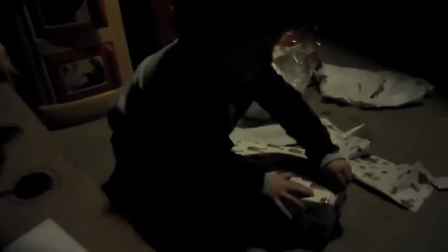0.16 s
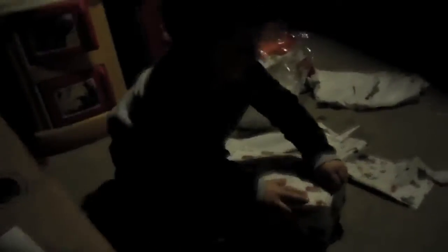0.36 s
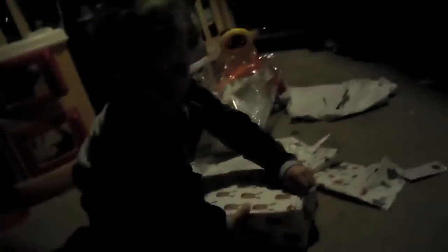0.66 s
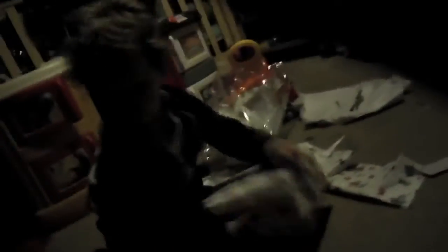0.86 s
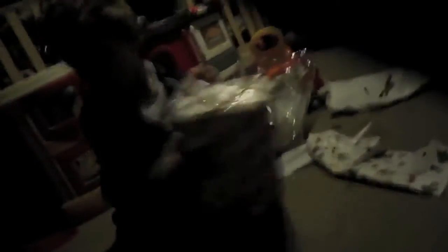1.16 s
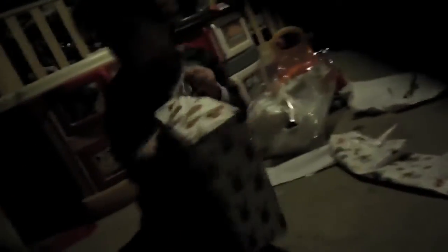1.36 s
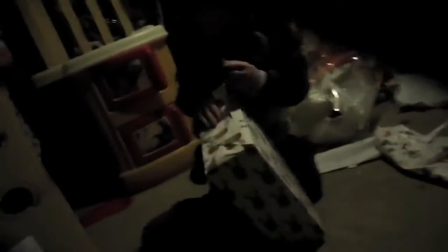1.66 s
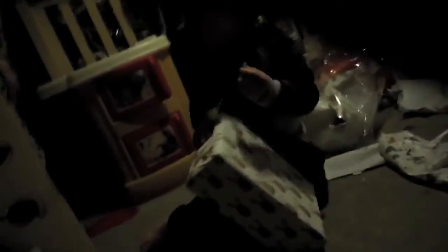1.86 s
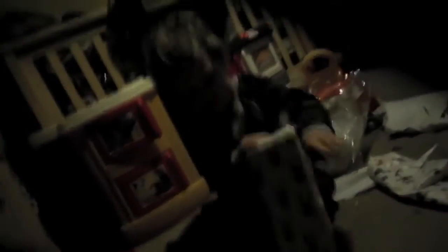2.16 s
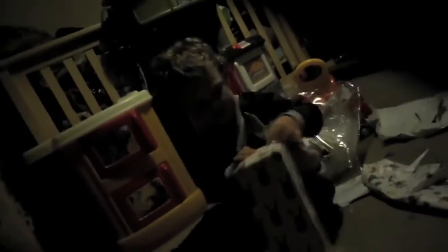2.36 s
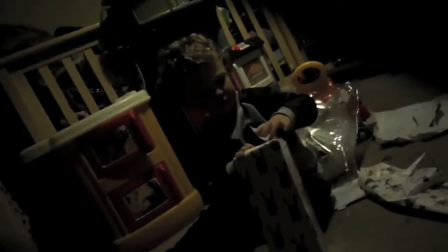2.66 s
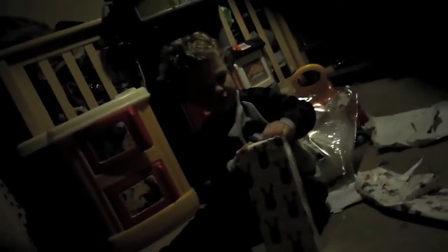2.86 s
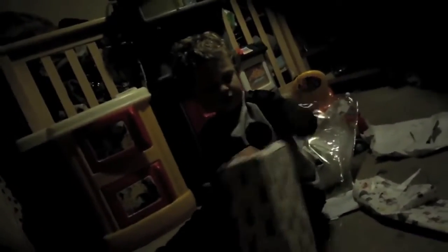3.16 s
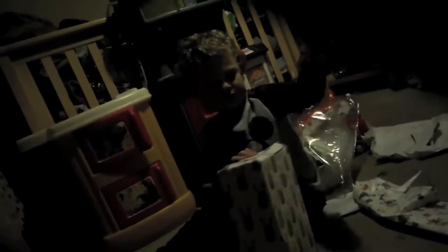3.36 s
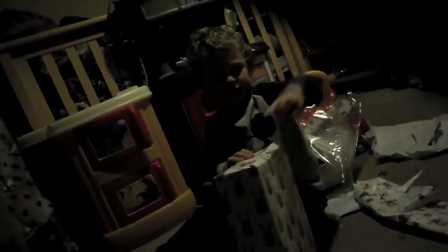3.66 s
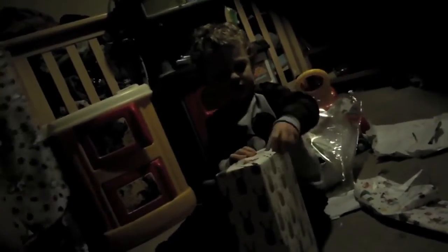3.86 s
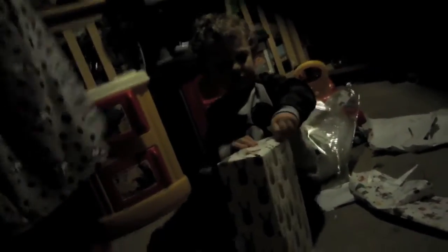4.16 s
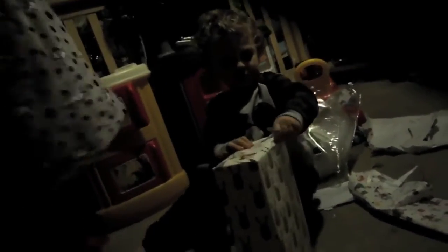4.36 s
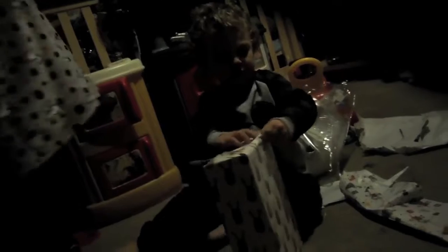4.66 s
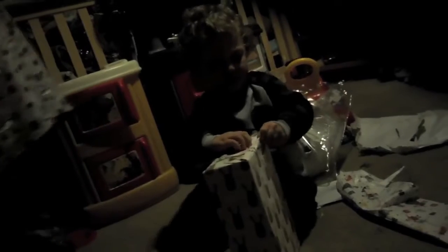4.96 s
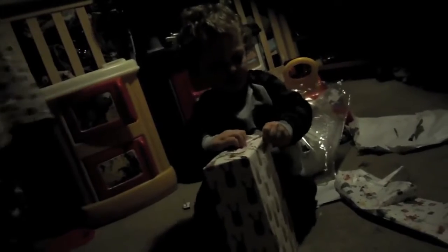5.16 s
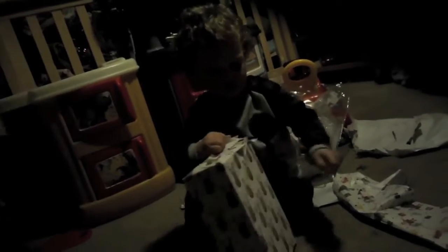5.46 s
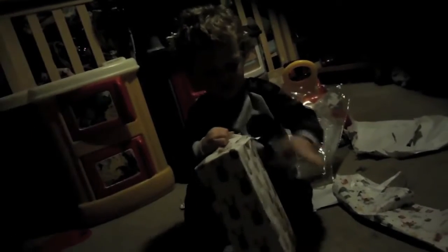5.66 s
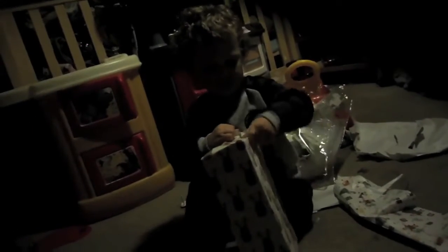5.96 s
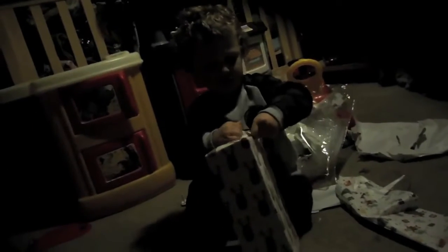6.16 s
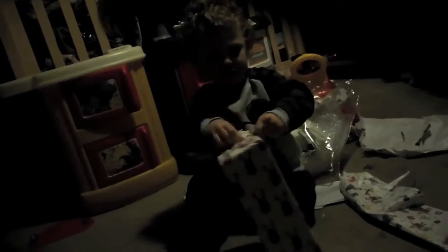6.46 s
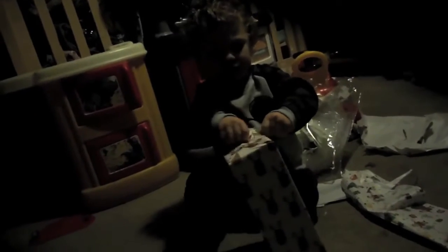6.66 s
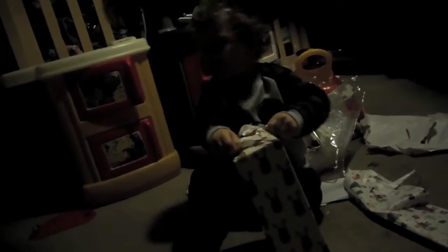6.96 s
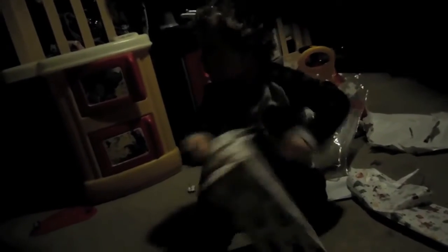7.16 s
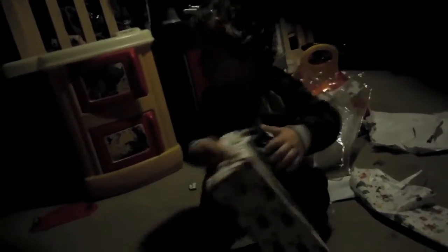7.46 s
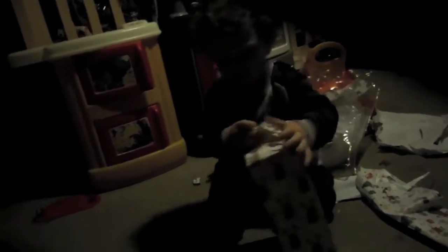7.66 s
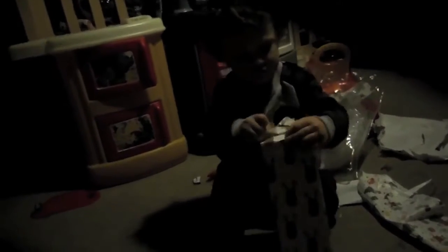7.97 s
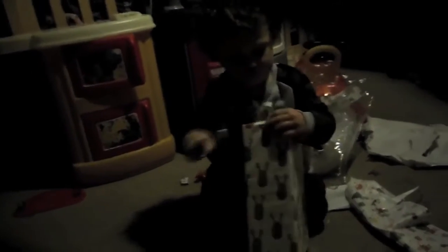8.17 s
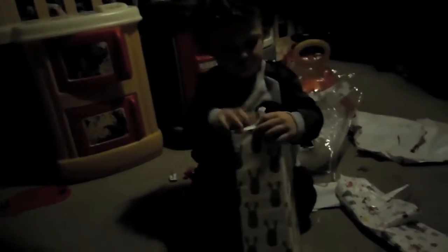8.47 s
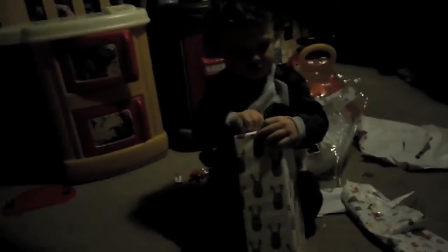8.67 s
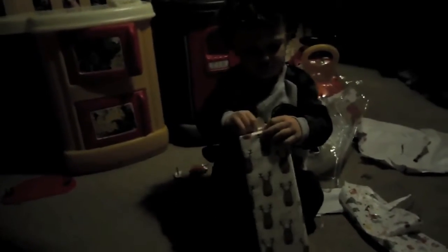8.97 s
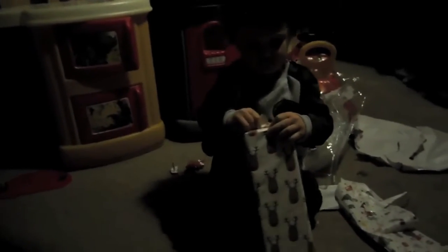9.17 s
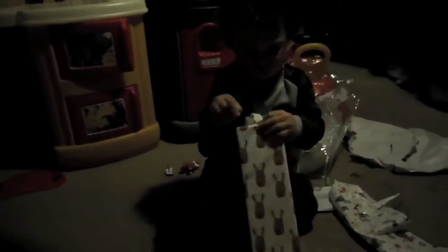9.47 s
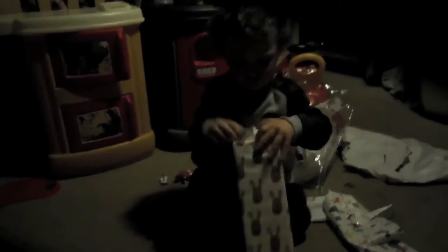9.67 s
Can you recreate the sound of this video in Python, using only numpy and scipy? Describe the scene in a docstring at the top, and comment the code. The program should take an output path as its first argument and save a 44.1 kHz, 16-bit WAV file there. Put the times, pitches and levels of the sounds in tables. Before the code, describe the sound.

Steady hiss covers the first second with a few paper ticks and a tiny box squeak, then falls away. A child tears wrapping paper from a cardboard box: a loud cluster of rips and hollow bumps at one second, then irregular snaps, short tears and finger rustling with pauses. Small carpeted room, microphone about a metre away, faint low room noise and a thin high whine.

```python
"""A steady hiss comes first and falls away around one second, leaving faint room noise and a thin whine.
On a carpeted floor, about a metre from a pair of microphones, a child tears wrapping paper off a gift box.
Short rips (bursts of jerking fibre clicks) and sharp snaps (a click and a flutter) stand over finger rustle;
the cardboard box is bumped through its wall resonances, rubbed with friction noise and squeaks as gliding tones.
The small room answers with a few echoes and a short tail."""
import sys
import numpy as np
from scipy import signal
from scipy.fft import rfft, irfft
from scipy.io import wavfile
from scipy.ndimage import uniform_filter1d

SR = 44100
rng = np.random.default_rng(int(sys.argv[2]) if len(sys.argv) > 2 else 0)


def dump(signal):
    """Clip the signal to [-1, 1] and save it as 16-bit WAV at the path in sys.argv[1]."""
    limited = np.clip(np.atleast_2d(signal).T, -1, 1)
    pcm = np.round(limited * 32767).astype(np.int16)
    wavfile.write(sys.argv[1], SR, pcm)


N = 433062
TIME = np.arange(N) / SR


def gain_of(db):
    """Decibels to amplitude."""
    return 10 ** (np.asarray(db) / 20)


def evened(x):
    """Scales to rms 1."""
    return x / np.sqrt(np.mean(x ** 2) + 1e-20)


def drift(count, smooth_s):
    """Slow random wandering of rms 1: white noise averaged over smooth_s seconds."""
    return evened(uniform_filter1d(rng.standard_normal(count), max(int(smooth_s * SR), 1)))


def read(points, hz):
    """Reads a table of (Hz, value) on a log-frequency axis."""
    f, value = np.transpose(points)
    return np.interp(np.log(hz + 1), np.log(f + 1), value)


def add(mix, s, sound):
    """Mixes a sound in at s seconds."""
    part = mix[..., max(round(s * SR), 0):][..., :sound.shape[-1]]
    part += sound[..., :part.shape[-1]]


def colour(x, shape_db, size=2048):
    """Causal minimum-phase filter of unit energy; shape_db gives dB for each frequency."""
    db = shape_db(abs(np.fft.fftfreq(size, 1 / SR)))
    log_spectrum = np.conj(signal.hilbert(np.log(gain_of(db))))
    taps = np.fft.ifft(np.exp(log_spectrum)).real
    taps /= np.linalg.norm(taps)
    return signal.oaconvolve(x, taps[None], axes=1)


def noise(count, apart):
    """White noise at two microphones: a common part and a smaller part of opposite sign."""
    common = rng.standard_normal(count)
    opposed = rng.standard_normal(count) * np.array([[1], [-1]])
    return (common + apart * opposed) / np.sqrt(1 + apart ** 2)


# Spectrum of the low noise of the room. Each row: frequency in Hz, density in relative dB per Hz.
ROOM_NOISE_SPECTRUM = [(20, -5), (30, -4), (39, 3.5), (52, -4.5), (90, -2), (180, -7), (320, -9.5),
                       (600, -16.5), (1200, -21.5), (2200, -27), (4000, -29), (7000, -31.5), (9500, -29.5),
                       (12000, -27.5), (16000, -35.5)]


def room_noise(level_db=-48.5):
    """Steady noise of the room, strongest in the bass."""
    floor = colour(noise(N, apart=.3), lambda hz: read(ROOM_NOISE_SPECTRUM, hz), size=8192)
    return gain_of(level_db) * floor[:, :N]


# Spectrum of the hiss. Each row: frequency in Hz, density in relative dB per Hz.
HISS_SPECTRUM = [(80, -12), (200, -4.5), (400, -2), (600, -7.5), (850, -4), (1150, -4), (1900, -9.5),
                 (3400, -7.5), (5400, -1), (6800, -5), (8400, -6), (10000, -5), (11800, -.5), (14500, -7),
                 (16000, -14)]
# Course of the hiss. Each row: time in seconds, level in dB.
HISS_COURSE = [(0, -36), (.5, -35.5), (.88, -35.5), (.96, -44), (1.3, -54), (2.5, -70), (3, -90)]


def hiss():
    """Coloured noise, steady at first, dropping just before one second and then dying away."""
    level_db = np.interp(TIME, *np.transpose(HISS_COURSE))
    return gain_of(level_db) * colour(noise(N, apart=.25), lambda hz: read(HISS_SPECTRUM, hz))[:, :N]


def whine(level_db=-62, pitch_hz=10234, wander_hz=70, wander_s=.004):
    """A thin electronic whine: a sine even in level but jittering in pitch."""
    turns = np.cumsum(pitch_hz + wander_hz * drift(N, wander_s)) / SR
    return gain_of(level_db) * evened(np.sin(2 * np.pi * turns))


# Spectrum radiated by the box. Each row: frequency in Hz, density in relative dB per Hz.
CARDBOARD_SPECTRUM = [(60, -18), (170, -2), (300, -1), (450, -3), (750, -6.5), (1200, -4.5), (1800, -8.5),
                      (2500, -7), (5000, -15), (12000, -26)]
# Resonances of the box walls. Each row: frequency in Hz, width in Hz, height in dB above that spectrum.
BOX_RESONANCES = [(302, 55, 4.5), (385, 55, 4), (564, 38, 4), (654, 38, 4), (853, 70, 2.5),
                  (1120, 120, 2.5)]


def cardboard(hz):
    """Response of the box in dB: a broad hump with a few damped wall resonances."""
    walls = sum(db / (1 + (2 * (hz - f) / width) ** 2) for f, width, db in BOX_RESONANCES)
    return read(CARDBOARD_SPECTRUM, hz) + walls


# Hands squeak on the wrapped box. Each row: start in seconds, length in seconds, first pitch in Hz,
# last pitch in Hz, level of the tone in dB, step from one partial to the next in dB.
SQUEAKS = [(0.44, 0.026, 290, 310, -35.5, -10), (0.46, .02, 376, 395, -31, -22),
           (3.82, 0.034, 2520, 2150, -47, -7), (3.822, .016, 3100, 3350, -46.5, -14)]


def squeaks(rough=.6, partials=3):
    """Stick and slip of a hand on the wrapped box: a brief tone of gliding pitch with a rough scrape."""
    out = np.zeros((2, N))
    for s, length, first_hz, last_hz, db, overtone_db in SQUEAKS:
        t = np.arange(0, length, 1 / SR)
        turns = np.cumsum(np.linspace(first_hz, last_hz, len(t))) / SR
        tone = evened(sum(gain_of(overtone_db * k) * np.sin(2 * np.pi * (k + 1) * turns)
                          for k in range(partials)))
        scrape = colour(noise(len(t), apart=.2), cardboard)[:, :len(t)]
        swell = signal.windows.tukey(len(t), .7)
        add(out, s, gain_of(db) * swell * (tone + rough * scrape))
    return out


# Fingers and sheet slide along the box. Each row: start in seconds, end in seconds, level in dB.
RUB_STROKES = [(1.681, 1.824, -47), (2.02, 2.143, -44.5), (2.23, 2.31, -47), (2.56, 2.8, -55.5),
               (2.82, 2.97, -49), (3.779, 3.9, -47.5), (4.11, 4.23, -48), (4.25, 4.46, -48.5),
               (4.59, 4.718, -51), (4.82, 5.147, -47), (5.2, 5.285, -49), (5.879, 5.938, -52),
               (6.189, 6.3, -53), (6.479, 6.58, -51.5), (8.07, 8.18, -46), (8.881, 9.24, -54.5)]
# Spectrum of the sliding. Each row: frequency in Hz, density in relative dB per Hz.
RUB_SPECTRUM = [(100, -11), (300, 5), (700, -0.5), (1600, -4), (2400, -3), (3400, -1.5), (5000, -3),
                (7500, -5.5), (11000, -7), (16000, -13)]


def rubs(judder_db=3.5, judder_s=.006):
    """Dry sliding friction: each stroke of noise swells and fades, and judders on the way."""
    out = np.zeros((2, N))
    for start, end, db in RUB_STROKES:
        count = int(max(end - start, .02) * SR)
        judder = gain_of(judder_db * drift(count, judder_s))
        friction = evened(judder * noise(count, apart=0.39))
        stroke = signal.windows.tukey(count, .7) * friction
        add(out, start, gain_of(db) * colour(stroke, lambda hz: read(RUB_SPECTRUM, hz)))
    return out


# Hands and floor bump the box. Each row: time in seconds, level in dB before the common trim,
# centre of the sound in Hz.
BOX_KNOCKS = [(.201, -39, 900), (.916, -24.5, 820), (.97, -37.5, 400), (1.032, -23.5, 674),
              (1.07, -37, 650), (1.094, -29.5, 645), (1.122, -33, 900), (1.196, -36, 600),
              (1.314, -31.5, 607), (1.398, -38, 560), (1.609, -36.5, 910), (2.066, -36, 650),
              (2.144, -29.5, 390), (2.161, -30, 480), (2.328, -28, 1400), (2.385, -28.5, 1190),
              (2.414, -31, 1200), (2.461, -38.5, 1200), (3.148, -34.5, 1310), (3.15, -35.5, 220),
              (3.736, -42, 120), (3.788, -43.5, 900), (3.826, -36, 800), (5.145, -29.5, 270),
              (5.316, -37.5, 350), (6.435, -44, 420), (6.595, -35, 380), (6.931, -38, 1620),
              (7.527, -34.5, 380), (7.53, -43, 1300), (7.666, -39, 1800), (7.91, -45, 1100),
              (8.061, -38.5, 350), (9.364, -29.5, 2500), (9.366, -33, 140), (9.368, -33, 750),
              (9.42, -26, 656)]


def knocks(trim_db=.8, focus_db=5, blow=6, depth_db=19, fade_s=.021):
    """A blow and a brief scuff sound the cardboard; place and hardness of the contact set the register."""
    out, t = np.zeros((2, N)), np.arange(0, 3 * fade_s, 1 / SR)
    contact = gain_of(-20 * t / fade_s)  # fades by 20 dB in fade_s
    for s, db, centre_hz in BOX_KNOCKS:
        def register(hz):
            octaves_off = np.log2((hz + 1) / centre_hz)
            return cardboard(hz) - np.minimum(focus_db * octaves_off ** 2, depth_db)

        push = contact * noise(len(t), apart=0.15)
        push[:, 0] += blow
        knock = colour(push, register)
        knock *= np.sqrt(4 * np.sum(contact ** 2) / np.sum(knock ** 2))
        add(out, s, gain_of(db + trim_db) * knock)
    return out


# Spectrum of the sheet. Each row: frequency in Hz, density in relative dB per Hz.
PAPER_SPECTRUM = [(100, -27), (300, -20.5), (650, -27), (1300, -17), (1900, -18.5), (2600, -10),
                  (3300, -8.5), (4200, -9), (5200, -8.5), (7000, -7.5), (9000, -3), (11000, -1),
                  (12100, 1.5), (14000, -4), (16000, -9.5)]


def paper(x, tilt, knee_hz=1800, ripple_db=2.5, count=28):
    """The sheet radiates mostly treble, more so when taut; each patch has its own chance resonances.

    The tilt in dB per octave acts above knee_hz."""
    ripple = ripple_db * rng.standard_normal(count)
    grid = np.linspace(0, SR / 2, count)

    def sheet(hz):
        tautness = tilt * np.log2(np.maximum(hz, knee_hz))
        return read(PAPER_SPECTRUM, hz) + tautness + np.interp(hz, grid, ripple)

    return colour(x, sheet)


def crackle(count, per_s, spread_db, smooth):
    """Fibres giving way: random clicks of very unequal size over a share of smooth friction noise."""
    chance, size, sign, side = rng.random((4, count))
    sizes = gain_of(spread_db * np.minimum(-np.log(1 - size), 3.5))
    clicks = (chance < per_s / SR) * sizes * np.sign(sign - .5)
    clicks = evened(clicks * (1 + (side - .5) * np.array([[.7], [-.7]])))  # each has its own place
    return (clicks + smooth * noise(count, apart=0.55)) / np.sqrt(1 + smooth ** 2)


# The fingers grip and work the sheet. Each row: start in seconds, length in seconds,
# level in dB before the common trim.
FINGER_GRIPS = [(0.87, 0.37, -44.5), (1.263, 0.21, -51), (1.502, 0.31, -43.5), (1.932, 0.25, -44.5),
                (2.19, 0.23, -49), (2.56, .18, -53.5), (2.803, 0.34, -47), (3.393, .07, -56),
                (3.824, .21, -48.5), (4.13, 0.11, -53.5), (4.24, 0.21, -48), (4.47, .13, -52),
                (4.605, 0.19, -45.5), (4.868, 0.61, -44), (5.533, 0.092, -45), (5.877, 0.048, -51.5),
                (6.059, 0.042, -46.5), (6.211, .26, -50), (6.587, 0.36, -45), (7.113, 0.038, -47),
                (7.267, 0.024, -46), (7.376, .13, -52.5), (7.528, 0.19, -46.5), (7.811, .14, -44.5),
                (8.03, 0.094, -45.5), (8.562, .22, -51), (8.9, .32, -47.5), (9.285, .16, -43),
                (9.565, 0.046, -49.5), (9.66, 0.15, -51.5)]


def finger_effort(arch_db=3, trim_db=1, close_s=0.035, release_s=.07, stir_db=-65):
    """Each grip closes quickly, presses hardest midway and lets go more slowly; between, the sheet stirs.

    The closing and release times are for 20 dB."""
    effort = np.full(N, gain_of(stir_db))
    for start, length, db in FINGER_GRIPS:
        away = np.maximum((start - TIME) / close_s, (TIME - start - length) / release_s)
        near = away < 2
        slack = np.minimum((2 * (TIME[near] - start) / length - 1) ** 2, 1)
        grip = gain_of(db + trim_db - arch_db * slack - 20 * np.maximum(away[near], 0))
        effort[near] = np.maximum(effort[near], grip)
    return effort


# Spectrum of the fine crinkles. Each row: frequency in Hz, density in relative dB per Hz.
RUSTLE_SPECTRUM = [(100, -16), (300, -1.5), (800, -4.5), (1700, -6.5), (2700, -3), (5000, -3.5),
                   (7000, -3.5), (9000, -2.5), (12000, 0.5), (14000, -3.5), (16000, -9)]


def rustle(level_db=-0.5, clump_db=2, clump_s=.015, tick_db=-8.5, tick_tilt=-2):
    """Small crinkles come in clumps as the fingers work the sheet; now and then a small crease ticks."""
    effort = finger_effort()
    clumps = gain_of(level_db + clump_db * drift(N, clump_s))
    crinkles = effort * clumps * crackle(N, per_s=900, spread_db=5.5, smooth=.75)
    ticks = effort * gain_of(tick_db) * crackle(N, per_s=35, spread_db=3, smooth=0)
    crinkles = colour(crinkles, lambda hz: read(RUSTLE_SPECTRUM, hz))
    return (crinkles + paper(ticks, tick_tilt))[:, :N]


# Loud snaps of the sheet. Each row: time in seconds, level in dB over 2 ms before the common trim,
# tilt in dB per octave.
SHEET_SNAPS = [(0.0928, -19, -1.5), (.187, -28, -2), (.3082, -28.5, -7), (.4776, -29, 1),
               (0.5075, -21.5, 0.5), (1.0235, -23, -3), (1.0806, -25, 0), (1.1133, -9.5, -1.5),
               (1.1394, -15, -1), (1.148, -14, 0), (1.185, -19.5, 1), (1.2657, -27.5, -1),
               (1.3309, -31, -2), (1.5006, -28.5, -1.5), (1.6564, -22, 7), (1.8633, -26, 2.5),
               (1.9366, -30, -1), (2.0165, -33, -1), (2.3882, -20, -5), (3.0523, -21, 4), (3.1333, -26, -2),
               (3.1431, -18, -2), (3.1497, -9.5, 2), (3.1543, -13, 2), (3.9025, -31, 1.5),
               (4.0197, -31.5, -0.5), (4.2368, -24.5, -1.5), (4.3322, -30, 2), (4.618, -29, 1),
               (4.6714, -29.5, -2), (4.7506, -24.5, -2), (4.795, -30, 9), (5.0247, -27, 3),
               (5.0874, -29, 0), (5.1137, -26, -4), (5.1439, -10, 3), (5.2459, -27, 1), (5.2636, -17, 1),
               (5.2855, -23, -1), (5.3224, -13.5, 2.5), (5.361, -22, 1), (5.444, -30, 1),
               (5.5923, -29.5, 0.5), (6.2194, -26, 5.5), (6.4294, -27.5, -0.5), (6.4984, -37, 4),
               (6.5959, -26, -5), (6.6533, -21.5, 1), (6.734, -24, 5), (6.7622, -13.5, 2),
               (6.7811, -19, -0.5), (6.9326, -26.5, -5.5), (6.9887, -30.5, 2), (7.2387, -33, -8.5),
               (7.482, -33, -1.5), (7.5406, -28, 1.5), (7.6811, -13, 5), (7.801, -32.5, -2.5),
               (7.9317, -31.5, -1), (8.0135, -39, -6), (8.0375, -26.5, -2.5), (8.0451, -20, 5),
               (8.0524, -16.5, 6), (8.0583, -16, 4), (8.5597, -32.5, -3), (8.6125, -28, -1.5),
               (8.6999, -29, 1), (9.195, -31, -3.5), (9.3643, -8.5, -1), (9.6565, -26.5, 1)]


def snaps(trim_db=.5, flutter_s=0.00058, flutter=0.59, tail_s=0.0039, tail=0.075):
    """A crease buckles with one click, and the patch around it flutters for a millisecond or so."""
    out, t = np.zeros((2, N)), np.arange(SR // 80) / SR
    window = SR * .002  # samples over which the level holds
    for s, db, tilt in SHEET_SNAPS:
        fading = flutter * np.exp(-t / flutter_s) + tail * np.exp(-t / tail_s)
        burst = noise(len(t), apart=0.2) * fading
        burst[:, 0] += rng.choice([-1, 1])
        snap = paper(burst, tilt)
        snap = snap * np.sqrt(window / np.sum(snap ** 2, axis=1, keepdims=True))
        add(out, s, gain_of(db + trim_db) * snap)
    return out


# Tears in the sheet. Each row: crest in seconds, level in dB, seconds to swell by 20 dB,
# seconds to fade by 20 dB (0 stops at the crest), tilt in dB per octave.
PAPER_RIPS = [(1.114, -13.5, .007, .016, -1), (1.139, -16, .024, .02, -0.5), (1.184, -22, .003, 0.02, -2),
              (1.198, -31, .012, .045, -3.5), (1.612, -18, 0.0273, 0.06, -0.5),
              (1.66, -27.5, 0.01, 0.07, 2.5), (1.775, -30, 0.04, 0, -1), (2.332, -30, .04, 0.04, -4.5),
              (2.395, -34, 0.04, 0.15, -5), (2.985, -27.5, .05, .11, -.7), (3.152, -16.5, .005, .014, 1.5),
              (5.145, -14, .002, .04, 0.5), (5.324, -15.5, .028, .032, 0.5), (5.368, -30, 0.1, .06, -1.5),
              (6.662, -22.5, 0.04, 0.03, 2.5), (6.765, -22.5, 0.03, 0.02, 3),
              (6.803, -20.5, 0.0556, 0.0464, 2), (6.84, -26, 0.05, 0.07, -1), (6.942, -33.5, 0.1, 0.05, -2),
              (8.055, -17.5, 0.02, 0.0253, 3.5), (8.08, -29.5, 0.04, 0.0247, -1.5),
              (9.34, -32.5, 0.14, 0.16, -1.5), (9.365, -13, .003, .028, 0)]


def rips(box_db=-21, box_per_tilt=-1.6, jerk_db=3.5, jerk_s=.007, patches=4):
    """A tear speeds up and runs out, jerking at several patches of the sheet; the pull also shakes the box.

    A slack sheet sounds duller and passes more of the pull: box_per_tilt is in dB per (dB per octave)."""
    out = np.zeros((2, N))
    for s, db, swell, fade, tilt in PAPER_RIPS:
        t = np.arange(-2 * swell, 2 * fade, 1 / SR)
        pull = gain_of(db + 20 * np.minimum(t / swell, -t / fade)) / np.sqrt(patches)
        for _ in range(patches):
            jerks = gain_of(jerk_db * drift(len(t), jerk_s))
            fibres = pull * jerks * crackle(len(t), per_s=750, spread_db=5, smooth=.45)
            fibres *= np.sqrt(np.mean(pull ** 2) / np.mean(fibres ** 2))
            box = colour(fibres.mean(0)[None], cardboard)
            box_gain = gain_of(box_db + box_per_tilt * tilt)
            add(out, s + t[0], paper(fibres, tilt) + box_gain * box)
    return out


# Reverberation of the small room. Each row: frequency in Hz, time to fade by 60 dB in seconds.
ROOM_FADE = [(150, 0.31), (500, 0.25), (2000, 0.22), (6000, 0.15), (12000, 0.11), (16000, 0.12)]


def room(x, wet_db=-8.5, early_db=-13, echoes=8):
    """A few echoes from floor and furniture, then a short tail that dies faster in the treble."""
    t = np.arange(SR // 2) / SR
    hz, at, z = signal.stft(noise(len(t), apart=0.79), SR, nperseg=256)
    fading = gain_of(-60 * at / read(ROOM_FADE, hz)[:, None])
    tail = signal.istft(z * fading, SR, nperseg=256)[1][:, :len(t)]
    tail *= np.clip((t - .002) / 0.0039, 0, 1)
    response = gain_of(wet_db) * tail / np.linalg.norm(tail[0])
    for delay, sign in zip(rng.uniform(.003, .014, echoes), rng.choice([-1, 1], echoes)):
        response[:, int(delay * SR)] += gain_of(early_db) * sign / np.sqrt(echoes)
    return signal.oaconvolve(x, response, axes=1)[:, :N]


def microphones(x, low_side_db=-6.0, split_hz=5000):
    """Two close ports hear long waves almost alike; the treble spreads more."""
    mid, side = (x[0] + x[1]) / 2, (x[0] - x[1]) / 2
    hz = np.fft.rfftfreq(N, 1 / SR)
    narrowing = gain_of(low_side_db / (1 + (hz / split_hz) ** 4))
    side = irfft(rfft(side) * narrowing, N)
    return np.array([mid + side, mid - side])


def scene():
    """The gift answers in the room over the background; the right channel is a little louder."""
    background = room_noise() + hiss() + whine()
    gift = squeaks() + rubs() + knocks() + rustle() + snaps() + rips()
    return microphones(gift + room(gift) + background) * gain_of([[-.55], [.55]])


def record(dry, ceiling=0.86, edge_hz=15880):
    """The sharpest peaks clip at the recorder's ceiling; then a low-pass sets its band limit."""
    limited = np.clip(dry, -ceiling, ceiling)
    band = signal.firwin(511, edge_hz, window=("kaiser", 9), fs=SR)
    return signal.oaconvolve(limited, band[None], "same")


dry = scene()
out = record(dry)
dump(out)
```